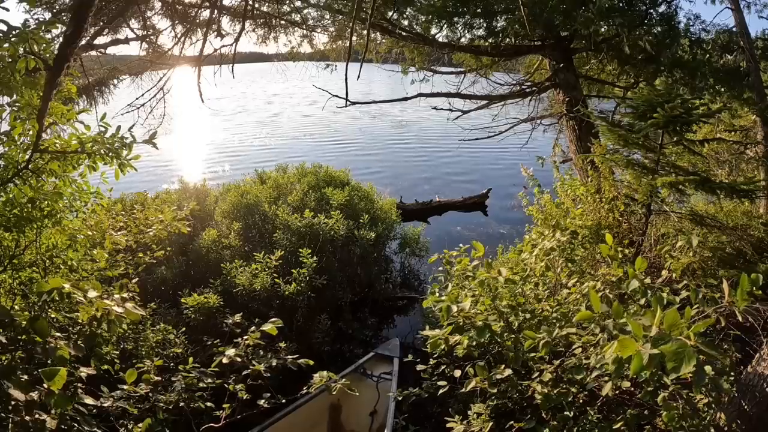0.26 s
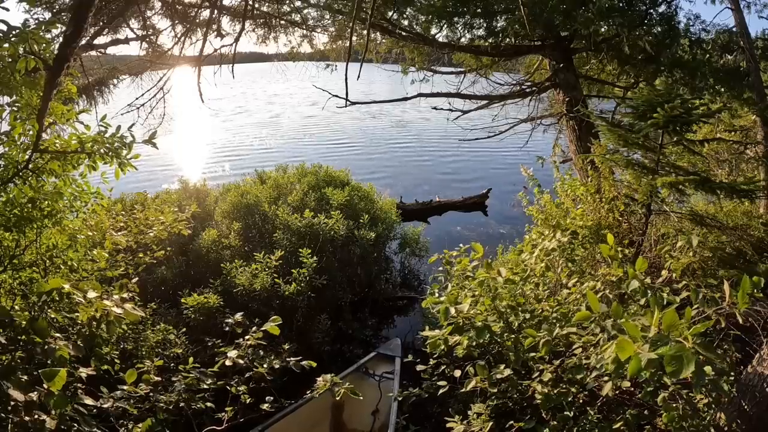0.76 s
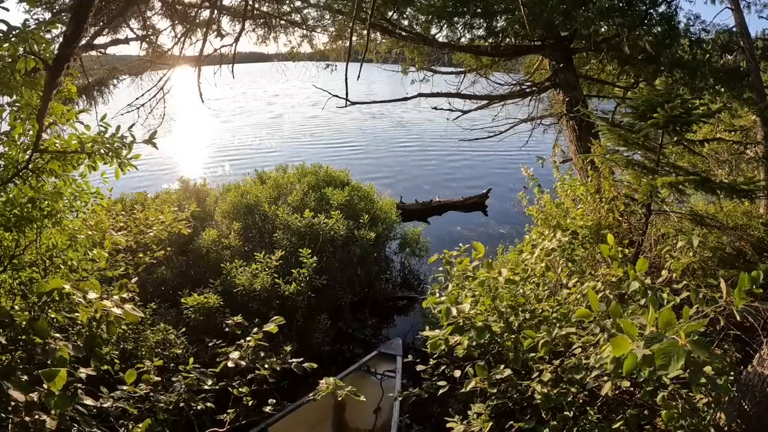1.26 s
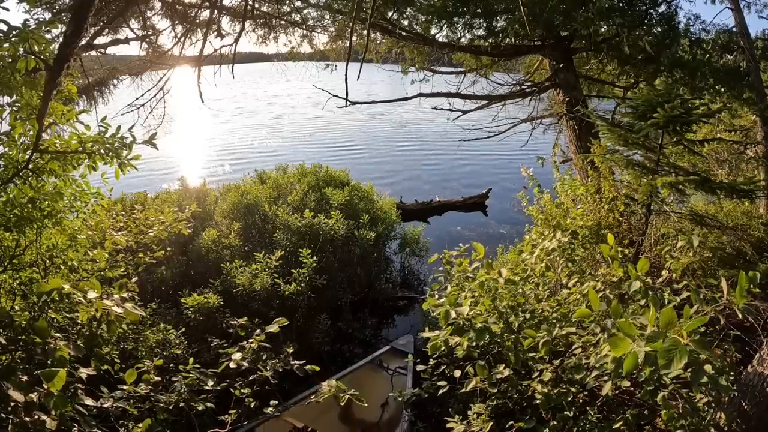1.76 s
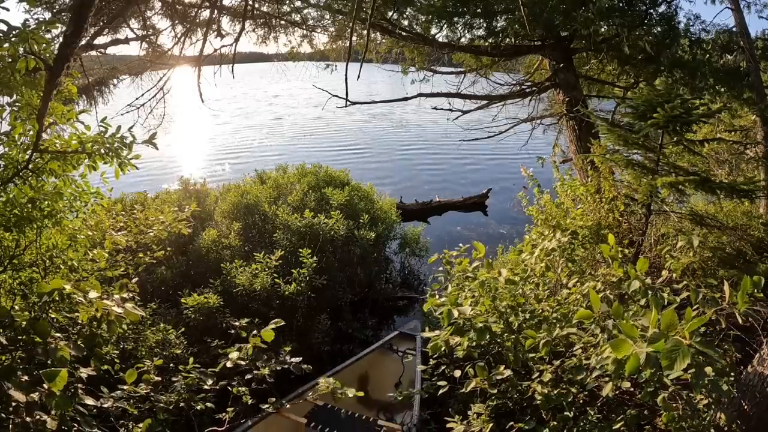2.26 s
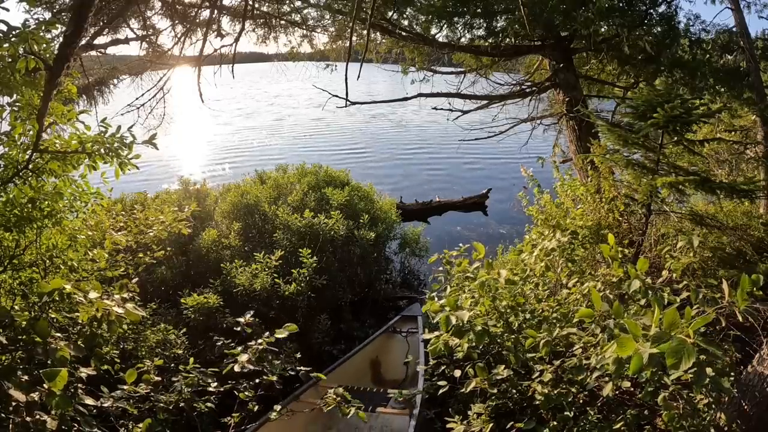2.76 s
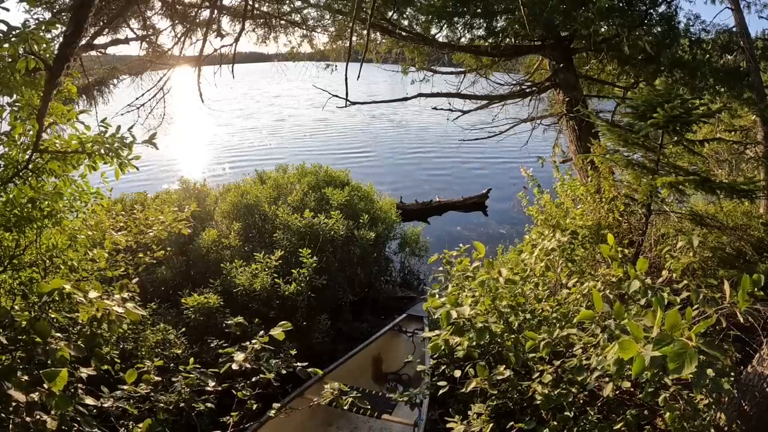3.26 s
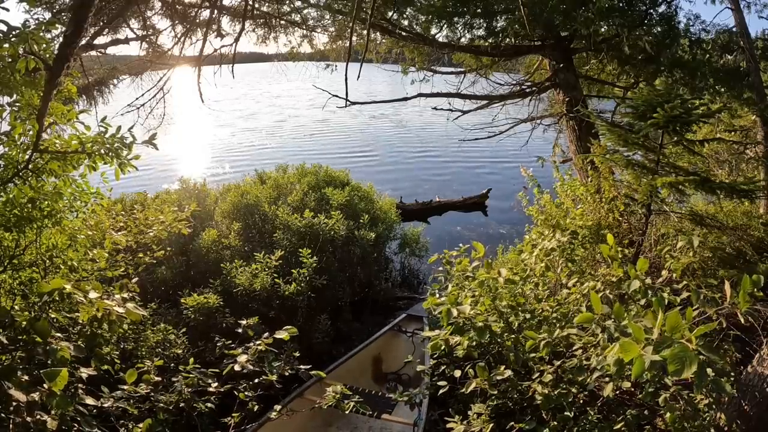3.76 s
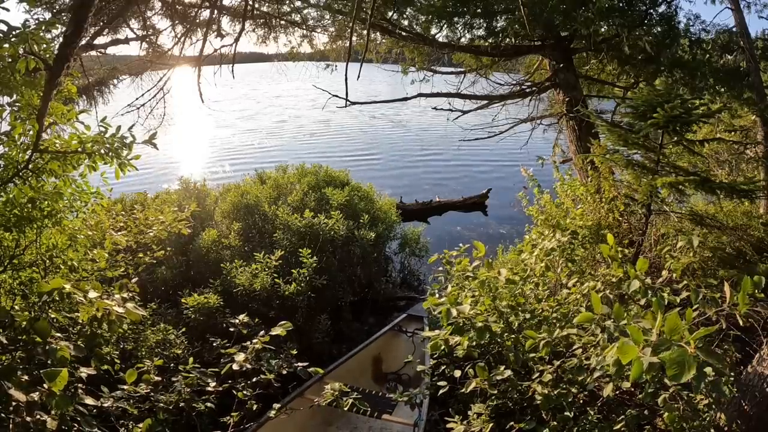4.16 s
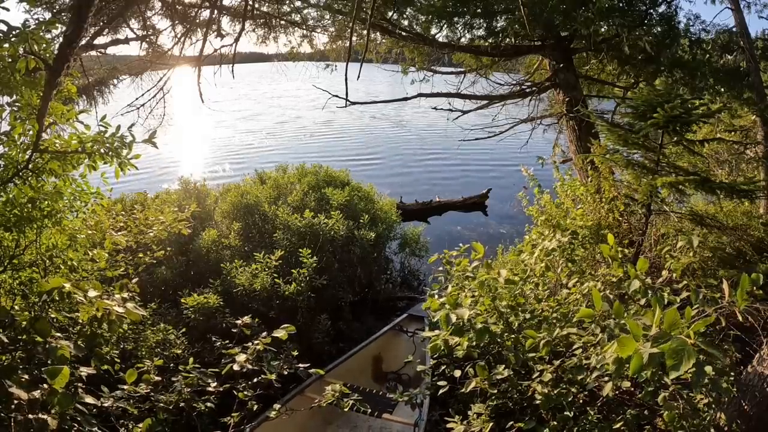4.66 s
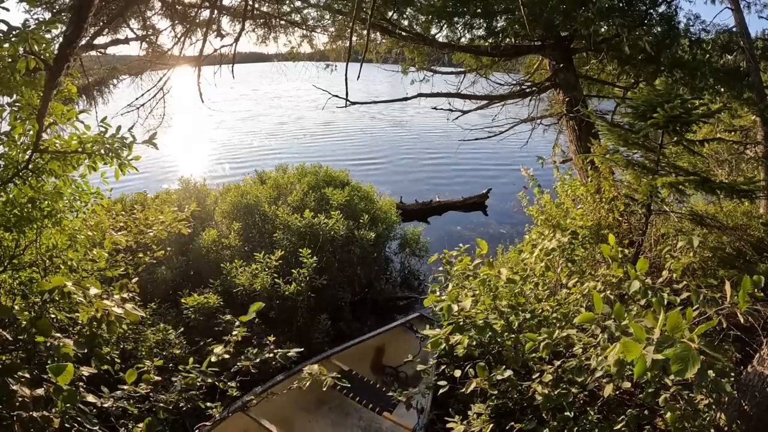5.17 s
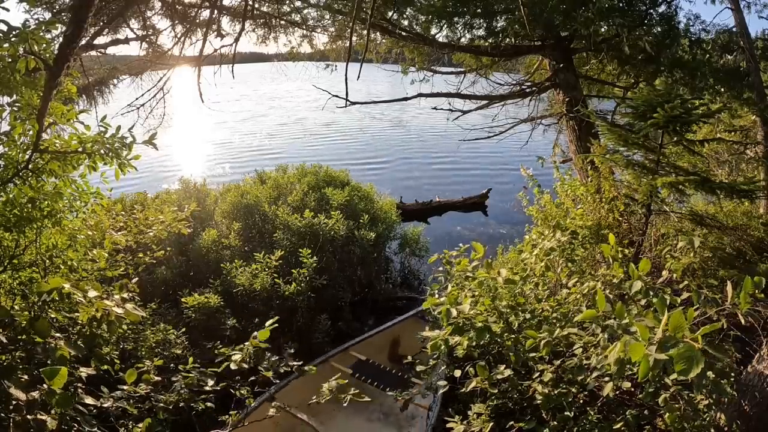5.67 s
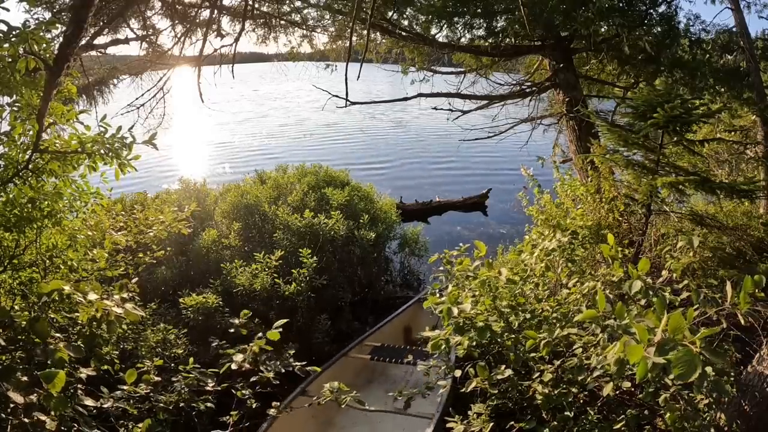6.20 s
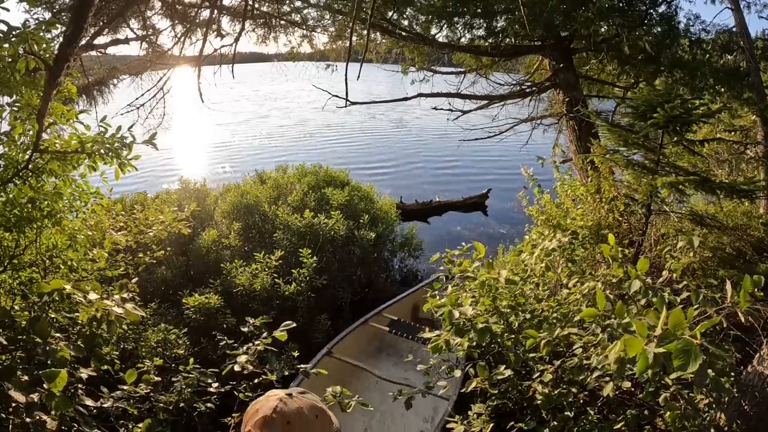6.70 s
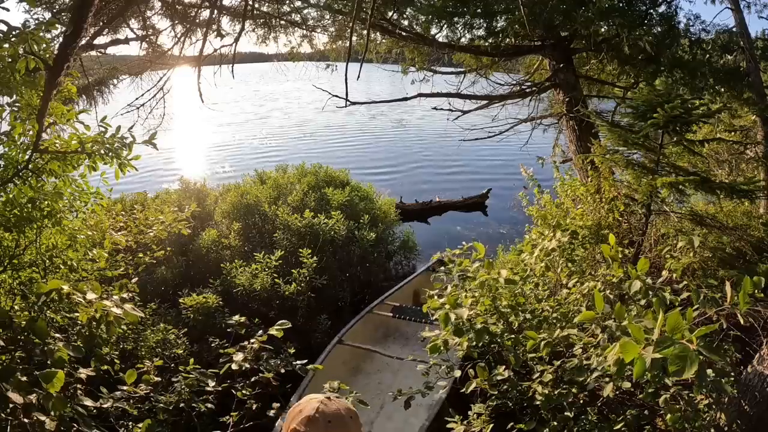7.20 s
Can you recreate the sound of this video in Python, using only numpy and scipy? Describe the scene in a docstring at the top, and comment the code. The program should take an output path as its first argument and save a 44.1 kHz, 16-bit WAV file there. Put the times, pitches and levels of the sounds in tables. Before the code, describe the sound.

A thin-walled canoe is shoved twice through lakeside shrubs, with leafy rustling, bark scraping, snapping twigs and hollow, ringing hull knocks.

```python
"""A thin-walled canoe is shoved twice through lakeside shrubs, heard from close by.
Stems slip along the hull and knock it: clicks and thuds set its ringing panels going.
Leaves and bark brush past as coloured noise and ticks, and twigs snap as woody cracks with a rattle.
Stems squeak and wet ground gurgles as gliding tones; wind rumbles and the shore washes faintly as noise."""
import sys
import numpy as np
from scipy import signal
from scipy.io import wavfile
from scipy.ndimage import uniform_filter1d

SR = 44100
rng = np.random.default_rng(int(sys.argv[2]) if len(sys.argv) > 2 else 0)


def int16_out(signal):
    """Quantize to a 16-bit WAV file."""
    q = np.round(np.clip(np.atleast_2d(signal).T, -1, 1) * 32767)
    wavfile.write(sys.argv[1], SR, q.astype(np.int16))


N = 328104  # length of the scene in samples


def gain_of(db):
    """Turns decibels into a plain multiplier."""
    return 10 ** (np.asarray(db) / 20)


def evened(x):
    """Scales a signal to an average strength (rms) of 1."""
    return x / np.sqrt(np.mean(x ** 2) + 1e-20)


def read(points, hz):
    """Reads a table between its points, with pitch on a log scale as the ear hears it."""
    table_hz, value = np.transpose(points)
    return np.interp(np.log(hz + 1), np.log(table_hz + 1), value)


def level(rows):
    """Joins rows of time and level into a smooth gain curve."""
    return gain_of(np.interp(np.arange(N) / SR, *np.transpose(rows)))


def add(mix, start_s, sound):
    """Mixes a sound in at its start time, cutting off what runs past the end."""
    part = mix[..., round(start_s * SR):][..., :sound.shape[-1]]
    part += sound[..., :part.shape[-1]]


def swell(t, rise_s):
    """Grows to 1 at the rise time, then dies away."""
    return t / rise_s * np.exp(1 - t / rise_s)


def wander(seconds):
    """Slow random drift of rms 1 that changes within about this time."""
    block = 256  # samples between drift points
    steps = rng.standard_normal(N // block + 2)
    steps = uniform_filter1d(steps, size=max(round(seconds * SR / block), 1))
    steps = evened(uniform_filter1d(steps, size=3))
    return np.interp(np.arange(N) / block, np.arange(len(steps)), steps)


def slips(per_s, spread_db, channels=1):
    """Sparse clicks of random sign, as from stick and slip; a few are large."""
    size = gain_of(spread_db * np.minimum(rng.exponential(1, (channels, N)), 4))
    sign = rng.choice([-1., 1.], (channels, N))
    happens = rng.random((channels, N)) < per_s / SR
    return evened(size * sign * happens)


# how alike the two microphones hear each pitch: (pitch [Hz], left-right likeness [0 to 1])
LIKENESS = [(60, 0.66), (130, 1), (800, 0.98), (1500, 0.72), (3100, 0.8), (6800, 0.61), (15000, 0.086)]
# stereo tilt of each pitch: (pitch [Hz], left over right [dB])
LEAN = [(600, -0.5), (2000, 1), (4000, 0.7), (9000, -2)]


def texture(drive, colour, patchy_db, flicker_db, size):
    """Colours two unrelated drives, adds patches and flicker, and shares them between the microphones."""
    overlap = size * 3 // 4
    hz, t, z = signal.stft(drive, SR, nperseg=size, noverlap=overlap)
    patches = uniform_filter1d(rng.standard_normal(z.shape[1:]), size=size // 64, axis=0)
    patches = evened(uniform_filter1d(patches, size=12, axis=1))
    flicker = evened(uniform_filter1d(rng.standard_normal(len(t)), size=10))
    same = np.clip(read(LIKENESS, hz), 0, 1)[:, None]
    lean = gain_of(.5 * read(LEAN, hz))[:, None]
    shared = np.sqrt((1 + same) / 2) * z[0]
    apart = np.sqrt((1 - same) / 2) * z[1]
    z = np.array([(shared + apart) * lean, (shared - apart) / lean])
    z *= gain_of(read(colour, hz)[:, None] + patchy_db * patches + flicker_db * flicker)
    return evened(signal.istft(z, SR, nperseg=size, noverlap=overlap)[1][:, :N])


# strength of the wind: (time [s], level [dB])
WIND = [(0.0, -42), (0.35, -45), (0.45, -36), (1.06, -43), (1.35, -34.5), (1.6, -40.5), (3.48, -44),
        (4.06, -41), (4.33, -37), (4.64, -48.5), (4.89, -32.5), (5.3, -44.5), (5.5, -38), (6.05, -44),
        (6.26, -35), (6.45, -46), (6.65, -37.5), (7.15, -44), (7.32, -33.5)]
# colour of the wind's rumble: (pitch [Hz], level per hertz [dB])
GUST = [(5.9, -38), (10, -7), (28, 8), (65, -23), (92, -6.5), (105, -15), (124, -21.5), (300, -30.5),
        (390, -68), (660, -120)]
# colour of the faint wash of the shore: (pitch [Hz], level per hertz [dB])
WASH = [(59, 3), (100, 6), (271, -22), (524, -20), (872, -44), (1480, -3), (2750, -42), (7290, -19),
        (16000, -67)]
WASH_DB = -67
WIND_LEFT_DB, WIND_SWAY_DB, WIND_SWAY_S = 5, 2.5, .3  # extra left over right, and its drift


def outdoors():
    """Lumpy wind noise on the microphones, drifting sideways, and the faint steady wash of the shore."""
    left_over_right_db = WIND_LEFT_DB + WIND_SWAY_DB * wander(WIND_SWAY_S)
    side = gain_of(np.array([[.5], [-.5]]) * left_over_right_db)
    rumble = texture(rng.standard_normal((2, N)), GUST, 1.7, 0.43, size=4096)
    wash = texture(rng.standard_normal((2, N)), WASH, 3.4, 0.45, size=1024)
    return level(WIND) * side * rumble + gain_of(WASH_DB) * wash


# bubbles in the wet ground: (time [s], length [s], start pitch [Hz], end pitch [Hz], level [dB])
BUBBLES = [(0.341, 0.023, 1015, 1100, -46), (.379, 0.007, 1180, 1300, -38.5),
           (0.493, 0.034, 980, 1030, -43.5), (0.513, 0.019, 1180, 1490, -46),
           (0.85, 0.0397, 612, 1140, -41.5), (4.94, 0.006, 920, 980, -26.5), (5.101, 0.0071, 875, 930, -23)]


def bubble(length, hz0, hz1, db):
    """A small air pocket whose pitch rises as it nears the surface."""
    count = round(length * SR)
    turns = np.cumsum(np.geomspace(hz0, hz1, count)) / SR
    return gain_of(db) * np.sin(2 * np.pi * turns) * signal.windows.tukey(count, .6)


# stems squeaking on the skin, levels before the low cut:
# (time [s], length [s], start pitch [Hz], end pitch [Hz], level [dB], step per overtone [dB])
SQUEAKS = [(1.965, 0.071, 5940, 6040, -59, -20), (2.08, .04, 1726, 1700, -49.5, -2.5),
           (2.114, .04, 1640, 1740, -40, -20), (2.273, 0.11, 1125, 1074, -30, -4),
           (2.38, 0.082, 1560, 1516, -44, -5.5), (3.345, 0.073, 1000, 960, -40.5, -29),
           (4.853, 0.093, 7700, 7800, -55, -23), (6.145, 0.077, 1450, 1352, -39, -9),
           (6.237, 0.049, 7350, 7100, -45, -24.5), (6.376, 0.033, 4840, 4260, -37.5, -16),
           (7.366, 0.083, 4980, 4820, -53, -23)]
WOBBLE = 0.026  # jitter of a squeak's pitch, as a share of it


def squeak(length, hz0, hz1, db, step_db, wobble):
    """Fast stick and slip: a jittery pitch, each overtone fluttering; the thin stem radiates lows poorly."""
    count = round(length * SR)
    drift, *grip = evened(uniform_filter1d(rng.standard_normal((7, count)), size=80))
    turns = np.cumsum(np.linspace(hz0, hz1, count) * (1 + wobble * drift)) / SR
    tone = np.zeros(count)
    for k in range(6):
        if (k + 1) * hz0 < 12000:
            flutter = gain_of(step_db * k + 4.3 * grip[k])
            tone += flutter * np.sin(2 * np.pi * (k + 1) * turns)
    tone = signal.lfilter(*signal.butter(2, 1700, "high", fs=SR), tone)
    return gain_of(db) * tone * signal.windows.tukey(count, .4)


# twigs snapping, treble and rattle as gains before the mix inside the snap:
# (time [s], level [dB], pitch of the wood [Hz], treble [dB], rattle of shaken twigs [dB])
SNAPS = [(0.437, -31, 810, 5, -3), (0.496, -36.5, 1000, -5, -8), (0.662, -39.5, 1450, -3, -3),
         (0.747, -17, 650, -9, -4), (0.876, -35, 910, -8, -6), (1.295, -34, 875, 8.5, -8.5),
         (1.531, -27, 850, -0.5, -4.5), (1.743, -42, 633, -2, 3), (2.356, -18.5, 1040, -6, -6.5),
         (2.434, -26, 710, -12, -6), (2.483, -22, 690, -2, -7), (2.909, -20, 832, -7.5, -10),
         (3.174, -14.5, 726, -18, -9.5), (3.209, -15.5, 705, -25, -11.5), (3.414, -46, 900, -3, -11),
         (3.505, -44.5, 900, -7, -10), (3.629, -42.5, 656, -15, -9), (3.727, -23, 860, -9.5, -30),
         (3.784, -49.5, 649, 5.5, -8), (3.829, -39, 980, -12, -5), (3.905, -38, 1020, -30, -4.5),
         (4.116, -46, 1340, 0.5, -14), (4.333, -36, 980, -17, -7), (4.357, -31, 1030, -7.5, -16),
         (4.423, -34, 1250, -17, -9), (4.452, -36.5, 1530, -4, -8), (4.595, -49.5, 1230, 11, -5),
         (4.68, -37, 1220, 1, -4), (4.76, -39.5, 760, 2.5, -5), (5.047, -36.5, 810, -6, 3.5),
         (5.48, -23.5, 800, -11, -16), (5.516, -19.5, 730, -13.5, -10), (5.699, -22.5, 634, -3, -8),
         (5.906, -30.5, 1080, 8.5, -9.5), (5.925, -28, 1030, 4, -8.5), (6.114, -34, 784, 5.5, -2),
         (6.286, -36, 885, 9.5, -5), (7.29, -25, 1380, -30, -6.5)]
RATTLE_T60 = .11  # seconds for the rattle to fall by 60 dB


def snap(db, hz, treble_db, rattle_db):
    """A hollow woody crack with a bright edge; then the shaken twigs and leaves rattle and fade."""
    t = np.arange(8000) / SR
    shared, left, right = rng.standard_normal((3, len(t)))
    rattle = gain_of(rattle_db - 60 * t / RATTLE_T60) * np.minimum(t / 0.0027, 1)
    crackles = evened(uniform_filter1d(rng.standard_normal(len(t)), size=60))
    rattle = rattle * gain_of(1.95 * crackles)
    wood_band = signal.butter(2, [hz / 6.0, hz * 1.78], "band", fs=SR, output="sos")
    wood_noise = evened(signal.sosfilt(wood_band, shared))
    crack = np.sin(2 * np.pi * hz * t) * swell(t, 0.76 / hz)
    wood = 0.79 * wood_noise * rattle + crack
    burst = shared + 0.55 * np.array([left, right])
    bright = signal.sosfilt(signal.butter(1, 1400, "high", fs=SR, output="sos"), burst)
    softened = signal.sosfilt(signal.butter(4, 6300, fs=SR, output="sos"), bright)
    edge = evened(softened + 0.032 * bright) * gain_of(treble_db)
    return gain_of(db) * (wood + edge * (0.34 * swell(t, 0.00093) + 0.57 * rattle))


# leafy sprigs whipping past: (middle time [s], length [s], level [dB])
SWISHES = [(0.278, .06, -60), (0.78, .06, -61), (1.11, 0.11, -60), (2.123, .1, -58), (2.484, .08, -52),
           (3.176, 0.065, -46), (3.323, 0.062, -52), (3.96, 0.12, -67), (4.33, 0.05, -65),
           (4.549, 0.077, -59.5), (4.69, 0.074, -51.5), (4.89, 0.054, -68), (5.11, .08, -55),
           (5.535, 0.051, -49), (6.136, 0.087, -55), (6.287, 0.058, -50.5)]


def swishes():
    """Gain curve of the sprigs: each swells and fades evenly."""
    out = np.zeros(N)
    for middle_s, length, db in SWISHES:
        add(out, middle_s - length / 2, gain_of(db) * np.hanning(round(length * SR)))
    return out


# colour of the leaves, and the level of their chirps by pitch: (pitch [Hz], level per hertz [dB])
LEAVES = [(710, -64), (1200, -4), (1940, -9.5), (2810, -8.5), (3140, -10), (3460, -10), (6530, -12.5),
          (7130, -13), (7610, -16), (8670, -22), (12000, -22), (13700, -34), (16400, -46)]


def chirps(count):
    """Leaf edges catch on the skin and whistle faintly for a moment, at random times and sides."""
    out = np.zeros((2, N))
    for when, pitch, size, side in rng.random((count, 4)):
        hz = 1200 * 8.5 ** pitch
        end_hz = hz * (.97 + 0.063 * side)
        tone = squeak(0.015 + 0.042 * size, hz, end_hz, read(LEAVES, hz), -19, 0.013)
        add(out, when * N / SR, tone * np.sqrt([[side], [1 - side]]))
    return evened(out)


# leaves brushing, before the surges: (time [s], level [dB])
BRUSH = [(0.03, -68.5), (0.04, -54), (0.37, -59.5), (0.46, -57), (1.45, -55.5), (1.79, -51.5),
         (2.25, -46.5), (2.36, -41), (2.59, -46.5), (2.87, -43), (3.2, -51.5), (3.225, -60), (3.58, -69.5),
         (4.28, -66.5), (4.55, -57.5), (5.19, -44.5), (5.41, -54), (5.69, -41.5), (5.85, -48),
         (5.92, -41.5), (6.03, -47.5), (6.22, -44.5), (7.43, -45.5)]
# bark rasping on the skin, before the surges: (time [s], level [dB])
BARK = [(0.03, -74), (0.04, -53), (0.78, -49.5), (1.0, -54), (1.55, -46.5), (1.91, -46.5), (2.34, -37),
        (2.55, -43.5), (2.72, -35), (2.9, -37), (3.0, -28.5), (3.19, -29.5), (3.27, -45.5), (3.55, -61),
        (3.94, -53), (4.27, -74), (4.34, -49.5), (4.51, -44), (4.56, -63), (4.7, -54.5), (5.03, -44),
        (5.1, -34.5), (5.25, -50), (5.45, -54), (5.5, -35.5), (5.75, -41), (5.84, -57), (5.94, -32),
        (5.99, -46), (6.18, -41.5), (6.73, -43.5), (7.43, -53)]
# colour of the rasping bark: (pitch [Hz], level per hertz [dB])
RASP = [(180, -52), (300, -29), (342, -4), (463, -5.5), (730, -9.5), (926, -6), (2020, -21), (4000, -30.5),
        (5200, -30.5), (8800, -120)]
BARK_SURGE_DB, LEAF_SURGE_DB, SURGE_S = 1.0, 1.0, .05  # stems catch and let go


def brush():
    """Leaves are a dense fizz of ticks; bark rasps lower and coarser, and both surge together."""
    ticks = slips(1500, 2.3, channels=2) * 0.49 + rng.standard_normal((2, N))
    leaves = texture(ticks, LEAVES, 2.5, 0.71, size=256) + gain_of(-16.5) * chirps(count=80)
    grit = slips(900, 3.7, channels=2) * 0.67 + rng.standard_normal((2, N))
    bark = texture(grit, RASP, 3.03, 2.4, size=512)
    surge = wander(SURGE_S)
    leaf_gain = level(BRUSH) * gain_of(LEAF_SURGE_DB * surge) + swishes()
    bark_gain = level(BARK) * gain_of(BARK_SURGE_DB * surge)
    return leaf_gain * leaves + bark_gain * bark


# big ringing panels: (pitch [Hz], level [dB], time to fall by 60 dB [s])
PANELS = [(80.6, -4.5, 1), (118, -4.5, 0.55), (135, 1.5, 0.41), (164.8, -7.5, 0.068), (216, -22, 0.56),
          (267.3, -1, 0.19), (307, -16, 0.32), (461.3, -7.5, 0.21), (504, -6, 0.38), (713, -11, 0.26),
          (819, -17, 0.33), (980, -27, .13), (1387, -36, 0.079)]
# crowd of small ringing modes: (pitch [Hz], level per hertz [dB])
SKIN = [(35, -53), (60, -13), (134, 1.5), (200, -4), (313, 1), (401, -6.5), (520, -9.5), (908, -21.5),
        (980, -14), (2400, -53), (3120, -66), (5280, -120)]
# how long the small modes ring: (pitch [Hz], time to fall by 60 dB [s])
SKIN_T60 = [(80, 0.56), (300, 0.2), (1000, 0.094), (3000, 0.1)]


def ring():
    """The hull's answer to a click: big panel tones over a noisy crowd of small modes, all dying away."""
    t = np.arange(SR // 2) / SR
    panels = sum(gain_of(db - 60 * t / t60) * np.sin(2 * np.pi * hz * t) for hz, db, t60 in PANELS)
    hz, at, z = signal.stft(rng.standard_normal(len(t)), SR, nperseg=1024, noverlap=896)
    z = z * gain_of(read(SKIN, hz)[:, None] - 60 * at / read(SKIN_T60, hz)[:, None])
    crowd = signal.istft(z, SR, nperseg=1024, noverlap=896)[1][:len(t)]
    crowd = crowd * np.minimum(t / 0.00046, 1)  # quick fade-in
    both = gain_of(-5.0) * evened(panels) + evened(crowd)
    return both / abs(both).max()


HULL_RING_DB = -4  # gain of the hull's ring beside the thud, before the contact softens it


def knock(db, hz, cycles, patch):
    """The dented spot thuds for a few cycles and sets the whole hull ringing."""
    t = np.arange(len(patch)) / SR
    dent = np.sin(2 * np.pi * hz * t) * swell(t, max(cycles, .2) / hz)
    push = np.hanning(round(.35 * SR / hz) + 2)  # a lower dent is a longer, duller contact
    ringing = np.convolve(patch, push / push.sum())[:len(t)]
    return gain_of(db) * (dent + gain_of(HULL_RING_DB) * ringing)


# drag of stems under the hull: (time [s], level [dB])
DRAG = [(0.0, -47.5), (0.4, -50), (1.38, -46), (1.61, -40.5), (2.19, -41.5), (2.48, -25.5), (2.88, -31),
        (2.96, -21.5), (3.21, -23), (3.67, -73), (3.94, -46.5), (4.18, -91), (4.37, -44.5), (4.58, -56),
        (4.72, -45.5), (4.87, -61), (5.09, -24.5), (5.22, -29.5), (5.27, -65), (5.37, -32.5), (5.56, -24.5),
        (5.77, -27.5), (5.97, -34.5), (6.42, -36.5), (6.6, -48), (6.7, -30.5), (6.83, -34.5), (6.94, -52),
        (7.0, -41), (7.43, -41.5)]
# stems striking the hull: (time [s], level [dB], pitch of the dent [Hz], rise [cycles])
KNOCKS = [(2.359, -22, 164, 0.61), (2.433, -19, 430, .6), (2.448, -20, 284, 1.2), (2.49, -21, 436, 1.6),
          (2.508, -19, 333, 0.63), (2.908, -10, 179, 0.37), (2.925, -13, 138, 1.15), (2.998, -18, 142, 1),
          (3.051, -8.5, 344, 0.85), (3.096, -17, 297, 1.4), (3.12, -15, 159, 1.2), (3.173, -8, 316, 0.84),
          (3.187, -9.5, 152, 0.93), (3.21, -14, 209, 0.91), (3.241, -16, 150, 0.76),
          (3.279, -16, 127, 0.98), (4.945, -21.5, 340, 1.76), (4.975, -20.5, 146, 1.46),
          (5.074, -17.5, 317, 1.4), (5.11, -18.5, 322, 1.6), (5.141, -21, 125, .7),
          (5.182, -15.5, 132, 0.83), (5.475, -15, 118, 0.61), (5.522, -9.5, 129, 0.46),
          (5.538, -12, 328, 1.43), (5.558, -12, 162, 0.58), (5.6, -12.5, 134, .5), (5.666, -17, 258, 0.83),
          (5.698, -6.5, 260, .6), (5.749, -18.5, 140, 0.82), (5.768, -15, 118, 0.66),
          (6.188, -23, 341, 2.4), (6.405, -16.5, 297, 1.1), (6.696, -13, 144, 0.33),
          (6.715, -19.5, 121, 0.56), (6.75, -22.5, 90, 0.94), (6.789, -24, 242, 2),
          (6.998, -17.5, 265, 0.5), (7.017, -14.5, 179, 0.9)]


def hull():
    """Uneven slips and single blows, each landing on one of four patches that ring differently."""
    patches = [ring() for _ in range(4)]
    where = rng.integers(0, 4, N)
    drive = slips(1200, 4.65)[0] * level(DRAG)
    out = np.zeros(N)
    for k, patch in enumerate(patches):
        out += signal.oaconvolve(drive * (where == k), patch / np.linalg.norm(patch))[:N]
    for k, (start_s, *row) in enumerate(KNOCKS):
        add(out, start_s, knock(*row, patches[k % 4]))
    return out


def scene():
    """Adds up the open air, the brush, the boat and the single small sounds."""
    mix = outdoors() + brush() + hull()
    for start_s, *row in BUBBLES:
        add(mix, start_s, bubble(*row))
    for start_s, *row in SQUEAKS:
        add(mix, start_s, squeak(*row, WOBBLE))
    for start_s, *row in SNAPS:
        add(mix, start_s, snap(*row))
    return mix


CEILING = .418  # largest swing before the input overloads, full scale = 1
EDGE_HZ = 16440  # top of the passed band


def record(dry):
    """Peaks above the ceiling overload the input and are cut flat; then a filter removes the top treble."""
    flat = np.clip(dry, -CEILING, CEILING)
    low_pass = signal.firwin(1023, EDGE_HZ, window=("kaiser", 9), fs=SR)
    return signal.oaconvolve(flat, low_pass[None], "same")


dry = scene()
out = record(dry)
int16_out(out)
```